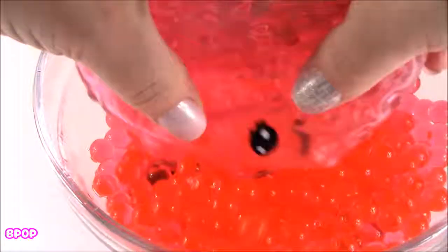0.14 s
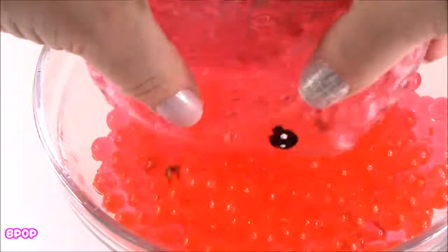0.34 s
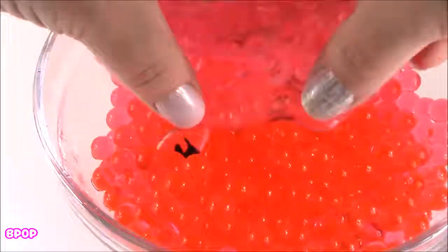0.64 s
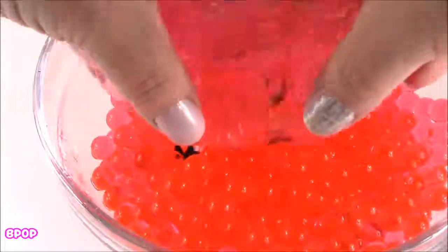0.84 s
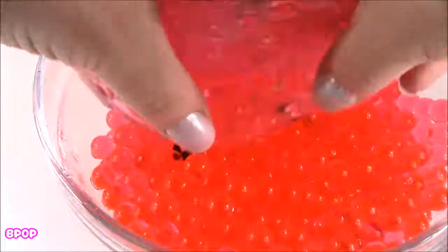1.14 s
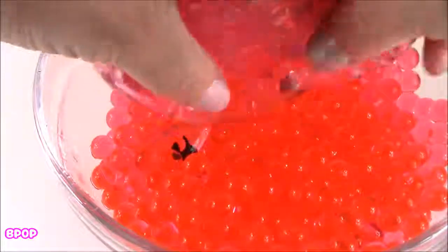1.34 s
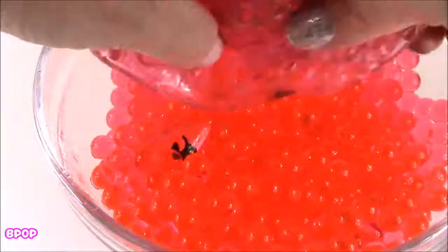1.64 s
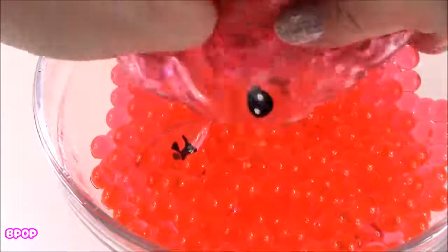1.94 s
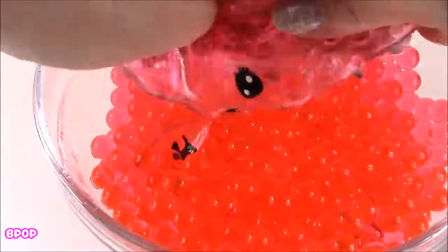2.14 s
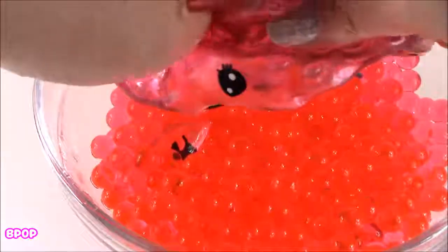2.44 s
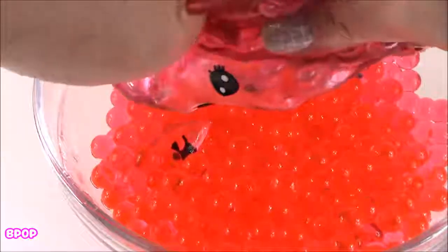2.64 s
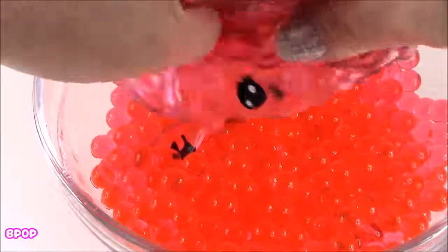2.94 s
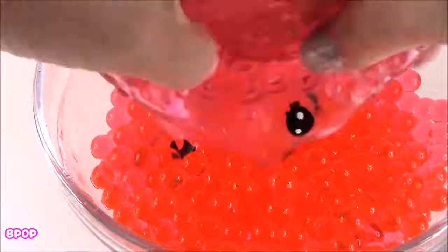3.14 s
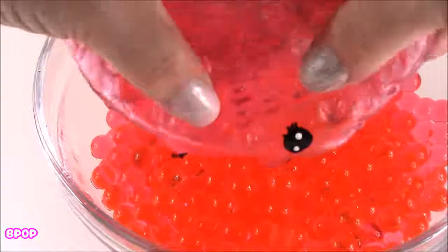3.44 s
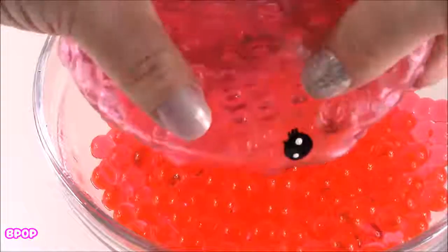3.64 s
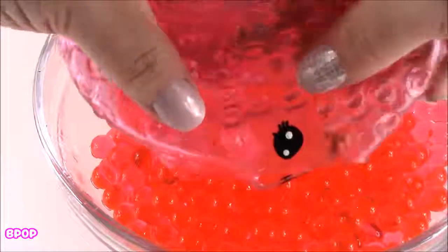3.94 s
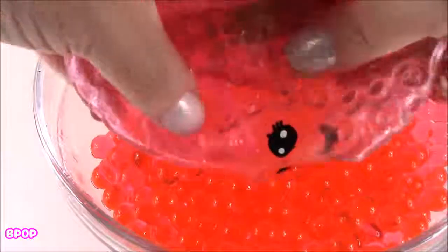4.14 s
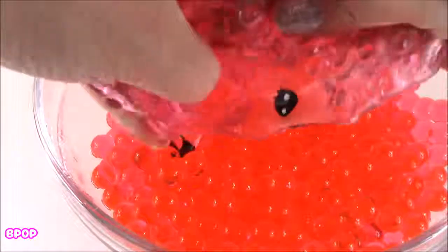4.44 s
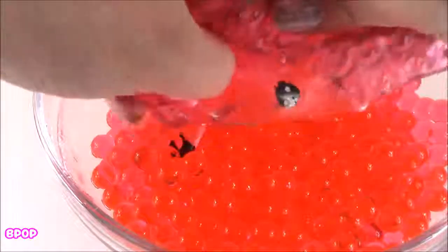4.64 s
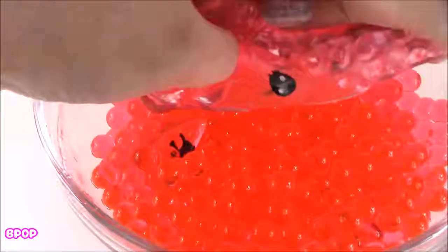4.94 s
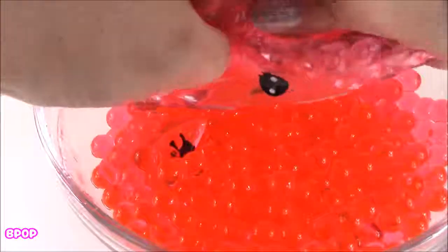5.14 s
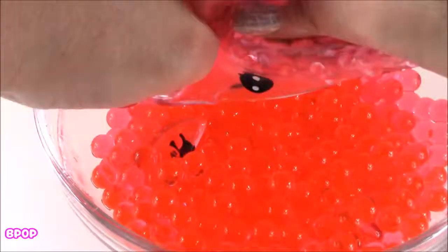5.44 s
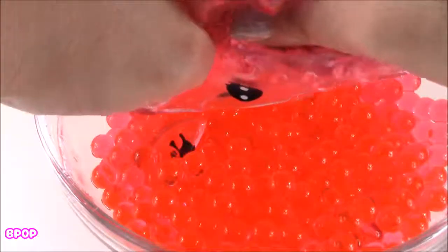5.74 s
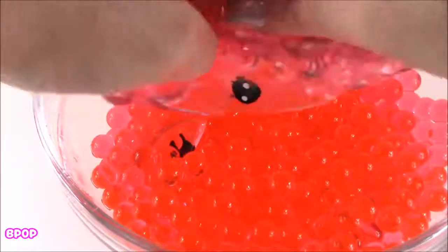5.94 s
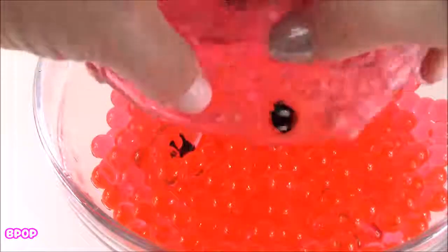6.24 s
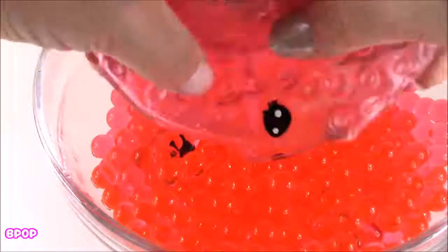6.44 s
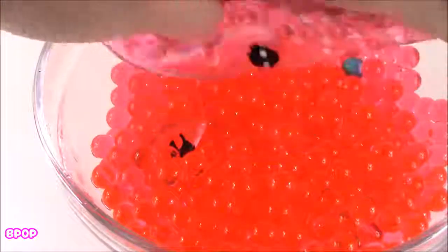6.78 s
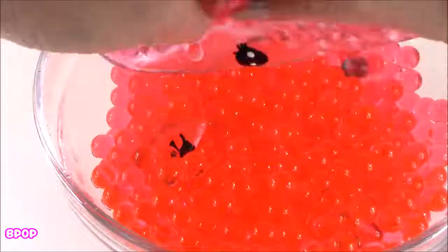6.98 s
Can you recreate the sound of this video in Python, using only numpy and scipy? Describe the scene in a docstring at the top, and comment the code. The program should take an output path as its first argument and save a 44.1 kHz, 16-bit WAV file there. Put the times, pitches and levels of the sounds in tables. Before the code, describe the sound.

Close stereo pickup of wet handling, leaning right: dull hollow knocks at first, a near-quiet lull, then sticky clicks, bubble plops and fizzing squelches in bursts. After a calmer middle with scattered knocks, rubber rasps briefly, air hisses through a wet fold, and strong pops and gurgling knocks crowd the ending. The glass bowl adds a short, slight ring; a faint motor-like hum slowly climbs behind in a small dry room.

```python
"""Close hollow knocks, wet snaps and a squeak, mostly to the right: hands knead a soft rubber toy full of
water beads over a glass bowl. Beads nudge the hollow toy into ringing modes; clicks ring wet cavities as
films break; air pockets plop as short rising sines; stick-slip pulses make the rubber squeak.
Clouds of small ringing bubbles squelch with every squeeze, and the bowl rings in sympathy.
Behind lie filtered-noise room air and a low gliding sine that mostly climbs, like a far motor."""
import sys
import numpy as np
from scipy import signal
from scipy.fft import rfft, irfft, next_fast_len
from scipy.io import wavfile
from scipy.ndimage import uniform_filter1d

SR = 44100
rng = np.random.default_rng(int(sys.argv[2]) if len(sys.argv) > 2 else 0)


def generate_wav(signal):
    """Clip the signal to [-1, 1] and save it as 16-bit WAV at the path in sys.argv[1]."""
    frames = np.transpose(np.atleast_2d(signal))
    scaled = np.clip(frames, -1, 1) * 32767
    pcm = np.round(scaled).astype(np.int16)
    wavfile.write(sys.argv[1], SR, pcm)


N = 313551
TIME = np.arange(N) / SR
EARS = np.array([[-1], [1]])  # left, right


def from_db(db):
    """Decibels to gain."""
    return 10 ** (np.asarray(db) / 20)


def rms_one(x):
    """Scale to unit rms."""
    return x / np.sqrt(np.mean(x ** 2) + 1e-20)


def in_time(rows):
    """Interpolate each column of a curve, sample by sample."""
    s, *columns = np.transpose(rows)
    return [np.interp(TIME, s, column) for column in columns]


def at_hz(points, hz):
    """Read a table on a log-frequency axis."""
    table_hz, values = np.transpose(points)
    return np.interp(np.log(np.maximum(hz, 1)), np.log(table_hz), values)


def colour(x, gain_at):
    """Filter by a smooth gain over frequency."""
    size = next_fast_len(N + SR // 10)
    hz = np.arange(size // 2 + 1) * SR / size
    return irfft(rfft(x, size) * gain_at(hz), size)[..., :N]


def place(x, pan):
    """Share a sound between the ears, frequency by frequency."""
    return colour(x, lambda hz: 2 / (1 + from_db(at_hz(pan, hz) * EARS)))


def add(out, s, sound):
    """Mix a sound in at a time."""
    at = max(round(s * SR), 0)
    out[at:at + len(sound)] += sound[:max(N - at, 0)]


def low_pass(x, hz, order):
    """Butterworth low-pass."""
    return signal.sosfilt(signal.butter(order, min(hz, SR / 2 - 1), fs=SR, output="sos"), x)


def high_pass(x, hz):
    """Second-order Butterworth high-pass."""
    return signal.sosfilt(signal.butter(2, hz, "high", fs=SR, output="sos"), x)


def ring(clicks, hz, t60):
    """A damped mode: a unit click sets a sine of height about 1 ringing, down 60 dB after t60 seconds."""
    radius = from_db(-60 / (t60 * SR))
    w = 2 * np.pi * hz / SR
    poles = [1, -2 * radius * np.cos(w), radius * radius]
    return signal.lfilter([0, np.sin(w)], poles, clicks + 1e-18)


def resonate(x, hz, q):
    """A resonance with gain 1 on top."""
    q = max(q, hz / 9000)  # never wider than 9 kHz
    return signal.lfilter(*signal.iirpeak(hz, q, fs=SR), x + 1e-18)


def background(air_db=-60, apart=0.54, hum_right_db=3):
    """Room air is coloured noise, partly separate at each ear; the hum is one gliding sine, louder on the right."""
    # colour of the air: [f/Hz, relative level/dB per Hz]
    air_spectrum = [(15, -31), (25, -7.5), (76, 2.5), (224, -2), (332, -6), (435, -4.5), (571, -10.5),
                    (846, -11), (1110, -15), (1950, -17), (4520, -23), (7570, -30), (8360, -50),
                    (9000, -84.5), (11700, -100), (19800, -120)]
    # balance of the air: [f/Hz, left minus right/dB]
    air_pan = [(40, -6), (150, -8.5), (420, -7.5), (1000, -0.5), (3000, 0.5), (8000, 0)]
    # glide of the hum before it is panned: [t/s, f/Hz, amplitude/dB]
    hum_glide = [(0, 69.5, -71), (3.1, 67.9, -73), (3.5, 70.9, -59), (4.2, 77.84, -58.5), (5.0, 81, -54.5),
                 (5.8, 82.3, -52.5), (6.3, 86.1, -52), (6.6, 88.3, -53.5), (6.8, 90.7, -72),
                 (7.11, 85, -96)]
    air = rng.standard_normal(N) + apart * rng.standard_normal((2, N))
    air = rms_one(colour(air, lambda hz: from_db(at_hz(air_spectrum, hz))))
    hz, db = in_time(hum_glide)
    hum = from_db(db) * np.sin(2 * np.pi * np.cumsum(hz) / SR)
    return place(from_db(air_db) * air, air_pan) + hum * from_db(hum_right_db * EARS)


def surroundings(x, near_db=-13, near_t60=0.17, room_db=-17, room_t60=0.28, dull_hz=7000):
    """Quick reflections from table and hands, then the faint tail of the room, different at each ear."""
    t = TIME[:SR // 2]
    near = rng.standard_normal(len(t)) * from_db(-60 * t / near_t60) * (t > .002)
    room = rng.standard_normal((2, len(t))) * from_db(-60 * t / room_t60) * (t > .006)
    echoes = from_db(near_db) * rms_one(near) + from_db(room_db) * rms_one(room)
    echoes = low_pass(echoes / np.sqrt(len(t)), dull_hz, order=1)
    return x + signal.fftconvolve(x[None], echoes, axes=1)[:, :N]


def bowl(x, trim_db=-1):
    """The air in the bowl and the loaded glass ring briefly in sympathy."""
    # modes under the toy, first the air, then the glass: [f/Hz, level before trim/dB, t60/s]
    bowl_modes = [(445, -10, 0.22), (672, -3, 0.062), (805, -4.5, 0.081), (1184, -18.5, 0.29),
                  (1350, -11.5, 0.26), (1530, -10.5, 0.4), (2068, -8, 0.049), (2330, -17, 0.18),
                  (2910, -7, 0.085), (3810, -7.5, 0.025), (4430, -7, 0.068), (5400, 1, 0.067)]
    out = x
    for hz, db, t60 in bowl_modes:
        q = np.pi * hz * t60 / np.log(1000)
        out = out + from_db(db + trim_db) * resonate(x, hz, q)
    return out


def kneading(attack_s=0.052, release_s=0.059, gurgle_lag_s=0.0067, gurgle_release_s=0.16):
    """Gurgle, squelch and fizz in dB: squeezes build, hold and die away over a resting stir; gurgle lingers."""
    # squeezes of the hands: [start t/s, held/s, gurgle level/dB, squelch level/dB, fizz level/dB]
    squeezes = [(0.01, 0.2, -55, -62.5, -67.5), (1.38, 0.2, -62.5, -85, -81),
                (1.682, .12, -58, -63.5, -70.5), (2.1, 0.2, -87, -63.5, -69),
                (2.48, 0.15, -88, -56.5, -59.5), (2.86, 0.1, -53, -49.5, -56),
                (3.021, 0.027, -45.5, -46.5, -54.5), (3.08, 0.27, -55, -60.5, -65),
                (4.5, 0.34, -70, -68, -72), (5.13, 0.15, -63.5, -55, -61), (5.37, 0.043, -86, -53.5, -65),
                (5.5, 0.39, -95, -66.5, -68.5), (5.929, 0.076, -58.5, -48, -53.5),
                (6.03, 0.13, -41.5, -45.5, -51.5), (6.2, 0.15, -49, -53.5, -59.5),
                (6.737, 0.14, -56.5, -51, -56.5), (7.074, .1, -50, -50, -60)]
    # the toy is never quite still in the hands: [gurgle level/dB, squelch level/dB, fizz level/dB]
    resting_db = (-70.5, -75.5, -80)
    timing = [(gurgle_lag_s, gurgle_release_s), (0, release_s), (0, release_s)]
    levels, t = [], TIME[::32]
    for k, (lag_s, fall_s) in enumerate(timing):
        power = from_db(resting_db[k]) ** 2
        for start, held, *db in squeezes:
            age = t - start - lag_s
            build = np.minimum(age, 0) / attack_s
            fall = np.maximum(age - held, 0) / fall_s
            power = power + (from_db(db[k]) * np.exp(build - fall)) ** 2
        levels.append(np.interp(TIME, t, 10 * np.log10(power)))
    return levels


def stirred(level_db, per_s):
    """Irregular moments: (s, dB by which the kneading stands above its rest, two chance values)."""
    chance = rng.standard_normal((200, 2))
    moments = (np.arange(len(chance)) + rng.random(len(chance))) / per_s
    rows = []
    for s, draw in zip(moments, chance):
        if s < TIME[-1]:
            effort_db = np.interp(s, TIME, level_db) - level_db.min()
            rows.append((s, effort_db, *draw))
    return rows


def thuds(swell_s=0.0036):
    """The whole filling shifts: the soft mass lurches and wobbles briefly as a low sine."""
    # lurches of the filling: [t/s, envelope peak level/dB, f/Hz]
    lurches = [(0.054, -44, 166), (1.755, -42, 227), (1.778, -44, 126), (3.033, -45.5, 140),
               (3.737, -41.5, 265), (6.12, -34.5, 181), (6.269, -31.5, 110), (6.915, -39.5, 213)]
    out, t = np.zeros(N), TIME[:SR // 8]
    shape = t / swell_s * np.exp(1 - t / swell_s)
    for s, db, hz in lurches:
        add(out, s, from_db(db) * shape * np.sin(2 * np.pi * hz * t))
    return out


def ticks(fizz_db, per_s=14, click_db=-47, spread_db=2, centre_hz=2800, top_hz=5800,
          rate_follows=0.83, level_follows=.6):
    """Damp fingers peel off the skin in fine filtered clicks, thicker and louder under a squeeze."""
    effort_db = fizz_db - fizz_db.min()
    born = rng.random(N) < per_s * from_db(rate_follows * effort_db) / SR
    db = click_db + level_follows * effort_db + spread_db * rng.standard_normal(N)
    return low_pass(resonate(born * from_db(db), centre_hz, 1), top_hz, order=2)


def seep(per_s=1800, fold_hz=4480, fold_q=6.5, trim_db=-1):
    """Air seeps through a wet fold: a dense string of tiny bursts rings the narrow gap."""
    # course of the seeping: [t/s, level before trim/dB]
    seeping_course = [(5.12, -74), (5.155, -56.5), (5.172, -66), (5.195, -57), (5.22, -63), (5.255, -57),
                      (5.288, -56.5), (5.31, -78)]
    db, = in_time(seeping_course)
    clicks = rng.standard_normal(N) * (rng.random(N) < per_s / SR)
    seeping = (TIME > seeping_course[0][0]) & (TIME < seeping_course[-1][0])
    hiss = resonate(resonate(clicks, fold_hz, fold_q), fold_hz, 2.2)
    return from_db(db + trim_db) * seeping * rms_one(hiss)


def squeak(jitter=1.1, rasp=0.098, rasp_rise=1.2, skin_q=5.4, trim_db=2.0, dulling_db_per_s=70):
    """A thumb's uneven stick-slip plucks and rasps the skin; the higher modes fade as the skin slackens."""
    # course of the rubbing: [t/s, slips per s/Hz, level before trim/dB]
    rubbing_course = [(4.946, 193, -64), (4.956, 155, -39), (4.968, 186, -39.5), (4.988, 96, -42),
                      (5.005, 170, -44.5), (5.025, 150, -46), (5.055, 143, -48), (5.08, 100, -57)]
    # modes of the rubber under the thumb: [f/Hz, starting relative level/dB, t60/s]
    skin_modes = [(1700, -1, 0.025), (1840, 11.5, 0.014), (2400, -2.5, 0.02), (2915, -2, 0.027),
                  (3650, 1, 0.0068), (4340, 1, 0.014), (4980, 2, 0.01), (5470, -1.5, 0.015)]
    per_s, db = in_time(rubbing_course)
    start_s, base_hz = rubbing_course[0][0], skin_modes[0][0]
    rubbing = (TIME > start_s) & (TIME < rubbing_course[-1][0])
    turns = np.cumsum(rubbing * per_s * (1 + jitter * rng.standard_normal(N))) / SR
    slips = np.diff(np.floor(turns), prepend=0)
    drag = rng.standard_normal(N) * (1 - turns % 1) * rubbing  # strongest just after a slip
    tilt_db = dulling_db_per_s * (TIME - start_s) * rubbing  # per octave above the lowest mode
    sound = 0
    for hz, level, t60 in skin_modes:
        ratio = hz / base_hz
        drive = rms_one(slips + rasp * ratio ** rasp_rise * drag)
        mode = resonate(ring(drive, hz, t60), hz, skin_q)
        sound = sound + from_db(level - tilt_db * np.log2(ratio)) * mode
    power = np.maximum(uniform_filter1d(sound ** 2, size=900), 1e-6)  # a steady grip evens the slips out
    return from_db(db + trim_db) * sound / np.sqrt(power) * rubbing


def grains(spectrum, per_s, cycles, spread_db, count, softness=2.56):
    """Tiny bubbles burst at random, each swelling and ringing at one of a set of pitches; rms 1."""
    out = np.zeros(N)
    born = np.flatnonzero(rng.random(N) < per_s / SR)
    size, sign, pitch = rng.random((3, N))[:, born]
    sizes = from_db(spread_db * np.minimum(-np.log(size), 4)) * np.sign(sign - .5)
    band = (pitch * count).astype(int)
    for k, hz in enumerate(np.geomspace(spectrum[0][0], spectrum[-1][0], count)):
        clicks = np.zeros(N)
        clicks[born] = sizes * (band == k)
        bubbles = resonate(ring(clicks, hz, cycles / hz), hz, softness)
        # log-spaced bands widen with pitch, so their power grows with hz
        out += bubbles * (from_db(at_hz(spectrum, hz)) * np.sqrt(hz / (bubbles @ bubbles)))
    return rms_one(out)


def spurts(per_s=160, decay_s=0.0061, between=0.6):
    """The water gives way in quick uneven spurts with lulls between them; a gain of rms 1."""
    gaps, sizes = rng.uniform(.3, 1.7, (2, 2000))
    starts = np.cumsum(gaps) / per_s
    starts = starts - starts[0]
    last = np.searchsorted(starts, TIME, side="right") - 1
    return rms_one(between + sizes[last] * np.exp(-(TIME - starts[last]) / decay_s))


def squelch(low, middle, high, gurgle_db=-1, hollow_db=-5, hollow_hz=440, hollow_q=18,
            squelch_db=-1.5, fizz_db=-2.5):
    """Water and air forced between beads: big bubbles stir the hollow; middling ones and fine fizz spurt."""
    # spectra of big, middling and fine bubbles: [f/Hz, relative level/dB per Hz]
    big_spectrum = [(80, -24.5), (130, -8.5), (200, -6.5), (300, -15), (380, -3.5), (440, -2), (540, -19),
                    (700, -15), (1000, -16)]
    middling_spectrum = [(450, -3.5), (650, -5), (900, 7), (1250, 0), (1900, 3.5), (2600, -12),
                         (3600, -20.5)]
    fine_spectrum = [(1800, -9.5), (2800, 5.5), (3600, 3.5), (4600, 4), (5500, -3), (7000, -3), (9000, -37)]
    big = grains(big_spectrum, per_s=1200, cycles=15.0, spread_db=6.0, count=22)
    middling = grains(middling_spectrum, per_s=8000, cycles=30.0, spread_db=3.0, count=34)
    fine = grains(fine_spectrum, per_s=9000, cycles=72, spread_db=5.0, count=22)
    hollow = rms_one(resonate(big, hollow_hz, hollow_q))
    gurgle = from_db(low) * (from_db(gurgle_db) * big + from_db(hollow_db) * hollow)
    spray = from_db(middle + squelch_db) * middling + from_db(high + fizz_db) * fine
    return gurgle + spray * spurts()


def plops(stretch_per_s=0.13):
    """An air pocket opens, rings and rises a little in pitch."""
    # air pockets: [t/s, envelope peak level/dB, starting f/Hz, swell/s, decay/s]
    pockets = [(0.057, -38.5, 985, 0.0022, 0.0018), (0.065, -34.5, 940, .002, 0.0038),
               (0.135, -37.5, 960, 0.00084, 0.0045), (0.206, -48, 926, 0.0011, .003),
               (1.755, -40, 1160, 0.0033, 0.0031), (1.944, -40.5, 840, .002, 0.0033),
               (2.163, -42.5, 940, .001, 0.0022), (2.177, -41, 910, .0012, 0.0027),
               (2.2301, -37, 890, 0.0024, 0.0023), (2.2685, -34.5, 1980, 0.00023, 0.0017),
               (2.4773, -36.5, 4400, .001, 0.0011), (2.5176, -23, 824, 0.0023, 0.0033),
               (2.8582, -34.5, 2910, 0.0009, 0.0032), (2.8589, -36, 5200, .001, 0.0041),
               (2.865, -33.5, 904, 0.0035, 0.0028), (3.028, -32.5, 596, 0.0073, 0.0095),
               (3.166, -41.5, 1206, 0.0016, 0.0031), (4.53, -48.5, 1730, 0.0029, 0.0032),
               (5.197, -40, 1700, 0.0019, 0.0024), (5.222, -44, 1380, 0.0022, 0.0048),
               (5.251, -43, 1580, 0.0015, 0.002), (5.309, -43.5, 1090, 0.0015, 0.002),
               (4.958, -35.5, 2960, 0.004, 0.0025), (5.279, -34.5, 965, 0.001, 0.0022),
               (5.32, -45, 1600, .001, 0.0018), (5.892, -20.5, 2085, 0.004, 0.0055),
               (6.036, -36, 786, 0.014, 0.019), (6.103, -38.5, 3220, 0.0025, 0.0056),
               (6.1376, -28, 1163, 0.0025, 0.0093), (6.332, -30.5, 977, 0.0011, 0.0063),
               (6.4175, -37.5, 1024, 0.001, 0.0066), (6.628, -35, 785, 0.0031, 0.0072),
               (6.8685, -29, 1710, 0.002, 0.003), (6.919, -27.5, 957, 0.0056, 0.0033),
               (7.0949, -20.5, 980, 0.0048, 0.0036)]
    out, t = np.zeros(N), TIME[:SR // 16]
    for s, db, hz, swell_s, decay_s in pockets:
        shape = np.minimum(t / swell_s, 1) * np.exp(-np.maximum(t - swell_s, 0) / decay_s)
        cycles = hz * t * (1 + stretch_per_s * t)  # pitch rises at twice this rate
        add(out, s, from_db(db) * shape * np.sin(2 * np.pi * cycles))
    return out


def random_snaps(squelch_db, per_s=10, rest_db=-69, follows=0.53, spread_db=6,
                 centre_hz=1700, spread_octaves=0.65, q=8.7, top_hz=6200, crackle_s=0.016):
    """Films break at random, harder when the water squelches; rows for snaps()."""
    rows = []
    for s, effort_db, size, pitch in stirred(squelch_db, per_s):
        db = rest_db + follows * effort_db + spread_db * size
        hz = min(centre_hz * 2 ** (spread_octaves * pitch), top_hz)
        rows.append((s, db, hz, q, top_hz, crackle_s))
    return rows


def snaps(squelch_db, crackles_per_s=4000, first=0.65, low_share=0.19,
          bubble_db=-4, bubble_q=22, bubble_spread=0.41):
    """Wet skin lets go: a click and a trail of crackles ring a cavity and four bubbles beside it."""
    # snaps at set moments, faint to loud:
    # [t/s, rms level over 15 ms/dB, cavity f/Hz, cavity Q, upper edge f/Hz, crackle decay/s]
    set_snaps = [(0.0569, -54, 990, 1.7, 4520, 0.0037), (0.134, -57, 1950, 0.89, 4100, 0.0026),
                 (0.2075, -69, 940, 3.5, 3480, 0.0018), (0.279, -61.5, 2260, 0.34, 4500, 0.0017),
                 (0.4435, -55.5, 3230, 1.1, 4900, 0.0067), (0.6724, -60.5, 1320, 2, 5000, 0.0028),
                 (0.9063, -65, 2150, 2.7, 5500, 0.0022), (1.3883, -56.5, 1640, 12, 6400, 0.0024),
                 (1.4785, -64.5, 2040, 0.63, 6000, 0.0018), (1.569, -57, 4150, 2.4, 6300, 0.01),
                 (1.7257, -48, 1200, 5, 6600, 0.012), (1.7536, -46, 1010, 9.8, 5550, 0.0024),
                 (1.908, -47, 920, 1.4, 7950, 0.0017), (1.923, -56, 1320, 1.3, 4030, 0.045),
                 (2.0383, -47.5, 940, 3.4, 5460, 0.0055), (2.083, -62.5, 1590, 0.89, 4500, 0.0063),
                 (2.163, -61, 1700, 4.5, 4500, 0.0018), (2.178, -75, 1520, 2, 4500, 0.0025),
                 (2.231, -53, 1030, 0.32, 5560, 0.00095), (2.2685, -37, 2040, 5.4, 4800, 0.00036),
                 (2.277, -52.5, 2100, 5.4, 3000, 0.0073), (2.3095, -55, 4460, 2.8, 7900, 0.0016),
                 (2.3183, -52, 2060, 3.5, 6600, 0.0015), (2.346, -63, 4700, 3, 6040, .006),
                 (2.461, -59, 2120, 1.2, 5000, 0.0041), (2.477, -49.5, 1790, 7.1, 5440, 0.0021),
                 (2.501, -47, 1900, 0.11, 6400, 0.015), (2.5898, -42, 3650, 1.1, 5300, 0.0021),
                 (2.635, -51, 2920, 0.3, 6460, 0.0014), (2.6845, -56, 4600, 2.3, 6000, 0.0024),
                 (2.815, -45, 1210, 0.52, 6000, 0.0098), (2.832, -52, 3800, 2.2, 5000, 0.0031),
                 (2.858, -46, 4030, 3.4, 5570, 0.0019), (2.885, -61, 4020, 0.78, 6000, 0.0011),
                 (2.8967, -43.5, 4800, .4, 6100, 0.0043), (2.912, -44, 1720, 8.2, 3000, 0.03),
                 (2.962, -48.5, 1600, 1.5, 4500, 0.0024), (2.973, -48, 1770, 9.3, 4000, 0.004),
                 (3.0144, -42, 1370, 5.3, 2980, 0.0024), (3.022, -43, 1620, 4.5, 2600, 0.0028),
                 (3.029, -42.5, 1320, 3.5, 3000, 0.0034), (3.038, -44, 1350, 1.9, 3020, 0.0041),
                 (3.044, -46, 1350, 2.1, 3470, .003), (3.167, -56, 1230, 8.3, 2500, 0.0063),
                 (3.233, -49.5, 1530, 0.34, 6300, 0.0043), (3.246, -55.5, 3040, 0.6, 5950, 0.0018),
                 (3.5656, -62.5, 2720, 1.3, 5500, 0.0019), (3.7287, -65, 3900, 1.7, 5850, 0.0041),
                 (4.199, -55.5, 1320, 6.7, 5000, 0.0046), (4.354, -58.5, 960, 2.6, 3500, .005),
                 (4.3772, -62.5, 1730, 8.3, 5000, 0.0018), (4.4406, -62, 2490, 2.6, 5000, 0.0079),
                 (4.5304, -59.5, 1710, 3.5, 4000, 0.003), (4.62, -64, 1700, 3, 4000, 0.0018),
                 (4.638, -59, 1900, 1.1, 5500, 0.0024), (4.672, -58, 2180, 1.05, 5420, 0.004),
                 (4.7584, -63, 2780, 1.8, 5000, 0.0033), (4.921, -59.5, 3000, 1.1, 5860, 0.0013),
                 (5.034, -44.5, 2130, 1, 6850, 0.0032), (5.048, -47.5, 1290, 2.7, 3500, 0.015),
                 (5.089, -52, 1920, 2.9, 4500, 0.0081), (5.132, -58, 2320, 3.4, 4000, .006),
                 (5.183, -61, 1800, 2, 3900, .002), (5.213, -56, 2130, 3.1, 3950, 0.0024),
                 (5.222, -51, 1500, 2, 3000, 0.024), (5.248, -51, 1700, 2.2, 5000, 0.0037),
                 (5.271, -53, 2190, 1.2, 7000, 0.004), (5.3402, -48.5, 4030, 2, 4370, 0.0014),
                 (5.372, -60.5, 3480, 0.65, 6940, .008), (5.4125, -47, 1990, 2, 3070, 0.0024),
                 (5.72, -62, 2500, 1, 6000, 0.0027), (5.7245, -38.5, 2980, 1.7, 6200, 0.0027),
                 (5.8603, -39.5, 1900, 1.9, 4860, 0.022), (5.8922, -41, 2135, 2.9, 3430, 0.0028),
                 (5.8965, -34.5, 2140, 3.6, 3700, .003), (5.902, -31.5, 2135, 3.5, 3800, 0.0034),
                 (5.932, -44.5, 1210, 4.3, 2520, 0.0057), (5.9423, -38, 2110, 2.6, 4000, 0.0041),
                 (5.96, -53, 3880, 3.8, 5960, 0.0018), (5.986, -53, 2600, 1, 5000, .002),
                 (5.995, -45, 1400, 3.3, 4000, .003), (6.022, -48, 1090, 1.2, 2800, 0.025),
                 (6.036, -50, 4350, 5.5, 6030, 0.01), (6.049, -39, 1700, 5.4, 2830, 0.011),
                 (6.082, -51, 3840, 0.52, 7100, .002), (6.1058, -54, 3180, 3, 5000, 0.0027),
                 (6.113, -49, 3460, 0.48, 7100, .005), (6.1385, -28, 1184, 0.23, 6170, 0.0094),
                 (6.17, -44, 1700, 1, 4960, 0.0027), (6.194, -56, 3500, .6, 6630, 0.00083),
                 (6.2445, -53, 2220, 2.5, 5500, 0.0012), (6.3325, -47.5, 3050, 3, 4500, 0.006),
                 (6.4175, -58, 1230, 2, 3500, 0.0016), (6.3715, -43.5, 3030, 1.5, 4200, 0.009),
                 (6.631, -51.5, 1440, 0.43, 5860, 0.015), (6.7605, -41, 3120, 0.38, 5600, 0.012),
                 (6.805, -47, 4400, 2.9, 6400, 0.012), (6.8416, -46, 3370, 4.8, 4040, 0.034),
                 (6.869, -37.5, 1790, 6, 2400, 0.012), (6.912, -44, 1650, 6.2, 3500, 0.0026),
                 (6.918, -33, 2320, 0.22, 3870, 0.011), (6.983, -37.5, 4100, 1.8, 5800, 0.0023),
                 (7.057, -40, 1470, 1.9, 2400, 0.014), (7.093, -31.5, 1076, 0.78, 3470, 0.039)]
    out, t = np.zeros(N), TIME[:SR // 12]
    frame = round(.015 * SR)
    for s, db, hz, q, top_hz, length_s in set_snaps + random_snaps(squelch_db):
        crackling = rng.random(len(t)) < crackles_per_s / SR
        clicks = rng.uniform(-0.93, 1, len(t)) * crackling * np.exp(-t / length_s)
        clicks[0] = first
        cavity = resonate(clicks, hz, q)
        pitches = np.clip(hz * np.exp(bubble_spread * rng.standard_normal(size=4)), 700, 7000)
        bubbles = sum(resonate(cavity, pitch, bubble_q) for pitch in pitches)
        snap = low_pass(cavity + from_db(bubble_db) * bubbles, top_hz, order=4)
        snap = high_pass(snap, low_share * hz)
        add(out, s, from_db(db) * snap * np.sqrt(frame / np.sum(snap ** 2)))
    return out


def random_knocks(gurgle_db, per_s=15, rest_db=-56.5, follows=0.15, spread_db=3,
                  centre_hz=430, spread_hz=27.2, overtone_db=-8.5):
    """Beads slip at random, harder when the water gurgles; rows for knocks()."""
    rows = []
    for s, effort_db, size, pitch in stirred(gurgle_db, per_s):
        db = rest_db + follows * effort_db + spread_db * size
        rows.append((s, db, centre_hz + spread_hz * pitch, db + overtone_db))
    return rows


def knocks(gurgle_db, hollow_db=-1, overtone_db=-9, swell_s=0.0078, overtone_swell_s=0.0031,
           scatter_db=2.0, bend_per_s=1.8):
    """A slipping bead nudges the hollow, which swells and fades, its pitch bending as the toy changes shape."""
    # slips at set moments, faint to loud:
    # [t/s, hollow level before trims/dB, hollow f/Hz, overtone level before trims/dB]
    set_knocks = [(0.019, -38.5, 435, -51), (0.05, -26.5, 419, -37), (0.078, -32, 438, -48),
                  (0.131, -27.5, 449, -44), (0.144, -39.5, 420, -53), (0.167, -33.5, 445, -56),
                  (0.202, -34.5, 430, -50), (0.24, -36, 411, -51.5), (0.259, -44, 443, -54),
                  (0.29, -45.5, 430, -54), (0.314, -46.5, 430, -54), (0.333, -52.5, 430, -54),
                  (0.476, -43.5, 417, -70), (0.524, -46, 450, -58), (0.575, -49, 437, -57),
                  (0.622, -51.5, 440, -59), (1.137, -44, 440, -56), (1.154, -41.5, 443, -55),
                  (1.182, -33, 445, -58), (1.206, -45, 448, -59), (1.222, -48, 445, -70),
                  (1.546, -43.5, 443, -62), (1.685, -40.5, 444, -55), (1.733, -35, 415, -62),
                  (1.802, -46, 468, -55), (1.913, -42, 451, -45), (2.52, -37, 454, -44),
                  (2.592, -42, 453, -43.5), (2.874, -41.5, 460, -46.5), (2.944, -38, 460, -57),
                  (2.965, -35.5, 452, -46), (3.028, -31.5, 432, -35.5), (3.068, -27, 442, -39),
                  (3.095, -41, 452, -57), (3.122, -35, 438, -66), (3.167, -31, 425, -41),
                  (3.207, -32, 426, -67), (3.231, -32.5, 430, -43.5), (3.246, -31.5, 430, -51),
                  (3.278, -33.5, 440, -55), (3.348, -39.5, 416, -57), (3.363, -40.5, 419, -64),
                  (3.389, -37.5, 432, -50), (3.737, -35.5, 427, -50), (3.853, -43, 425, -72),
                  (4.056, -44.5, 415, -57), (4.078, -35, 428, -52), (4.19, -40.5, 383, -50),
                  (4.444, -42, 430, -56.5), (4.641, -43, 437, -52), (4.674, -42, 387, -56),
                  (4.79, -46, 452, -68), (5.098, -45, 446, -66), (5.132, -40, 447, -63),
                  (5.145, -43, 453, -49), (5.166, -45, 444, -60), (5.183, -41, 463, -55),
                  (5.197, -48, 458, -60), (5.277, -43.5, 445, -55), (5.352, -42, 411, -54),
                  (5.989, -41, 437, -44.5), (6.035, -28.5, 445, -32.5), (6.064, -31, 458, -38),
                  (6.091, -28.5, 427, -56), (6.115, -24.5, 430, -57), (6.144, -29, 445, -49),
                  (6.166, -26.5, 387, -52), (6.193, -34, 424, -52), (6.228, -31.5, 424, -48),
                  (6.249, -31.5, 434, -56), (6.27, -24.5, 395, -36.5), (6.29, -38, 430, -49),
                  (6.331, -32, 432, -45), (6.347, -30.5, 393, -43), (6.369, -30, 421, -46.5),
                  (6.416, -31, 384, -43), (6.439, -41.5, 385, -71), (6.586, -40.5, 430, -57),
                  (6.662, -40, 440, -41), (6.679, -40.5, 390, -46.5), (6.919, -30.5, 452, -44),
                  (7.097, -37, 440, -52)]
    # modes of the hollow body: [ratio to hollow f, relative level/dB, t60/s]
    hollow_modes = [(0.337, -19.5, 0.061), (0.553, -15.5, 0.032), (0.881, -15, 0.14), (1.011, -2, 0.072),
                    (1.38, -23, 0.096)]
    # its overtones: [f/Hz, relative level/dB, t60/s]
    overtone_modes = [(798, 7.5, 0.022), (934, 6, 0.043), (982, 5, 0.076)]
    out, t = np.zeros(N), TIME[:SR // 8]
    for s, lower_db, pitch_hz, upper_db in set_knocks + random_knocks(gurgle_db):
        low = [(ratio * pitch_hz, lower_db + hollow_db + db, t60, swell_s)
               for ratio, db, t60 in hollow_modes]
        high = [(hz, upper_db + overtone_db + db, t60, overtone_swell_s)
                for hz, db, t60 in overtone_modes]
        bent = t + bend_per_s * rng.uniform(-0.81, 1) * (t - swell_s) ** 2  # warped time
        for hz, db, t60, swell in low + high:
            rise = np.sin(np.pi / 2 * np.minimum(t / swell, 1))
            fade = from_db(db + scatter_db * rng.normal() - 60 * np.maximum(t - swell, 0) / t60)
            add(out, s, rise * fade * np.sin(2 * np.pi * (hz * bent + rng.random())))
    return out


def scene(low_cut_hz=60):
    """The toy over its bowl, in the room; deep bass is cut from the toy."""
    # where the toy sits: [f/Hz, left minus right/dB]
    toy_pan = [(100, -3.5), (200, -12.5), (420, -19), (700, -15), (1400, -7.5), (2800, -3), (5500, -3),
               (9000, 1.5)]
    # phase of the toy between the ears: [f/Hz, lead of the left/rad]
    toy_phase = [(0, 0.4), (260, 0.41), (690, -1.74), (950, 0.68), (2670, 0.97), (9220, -1.32)]
    low, middle, high = kneading()
    toy = thuds() + ticks(high) + seep() + squeak() + squelch(low, middle, high)
    toy = toy + plops() + snaps(middle) + knocks(low)
    toy = high_pass(toy, low_cut_hz)
    left, right = place(surroundings(bowl(toy)), toy_pan)
    left = colour(left, lambda hz: np.exp(1j * np.interp(hz, *np.transpose(toy_phase))))
    return background() + np.array([left, right])


def record(dry, cutoff_hz=9400):
    """The top is cut steeply by an elliptic low-pass."""
    return signal.sosfilt(signal.ellip(10, .1, 70, cutoff_hz, fs=SR, output="sos"), dry)


dry = scene()
out = record(dry)
generate_wav(out)
```